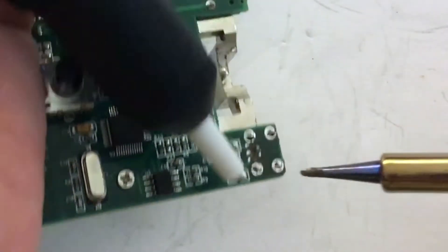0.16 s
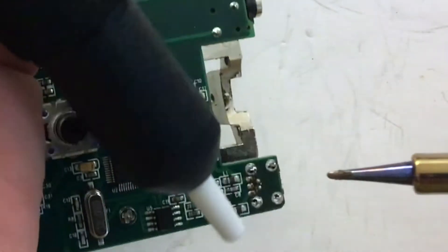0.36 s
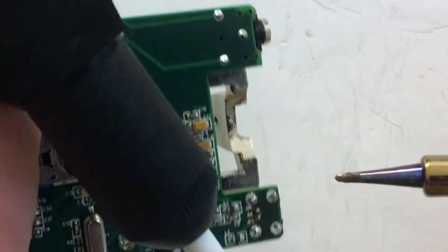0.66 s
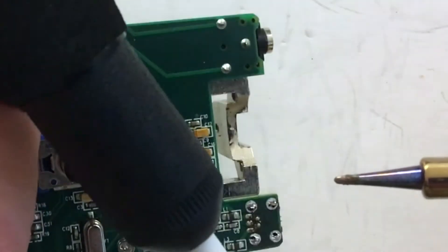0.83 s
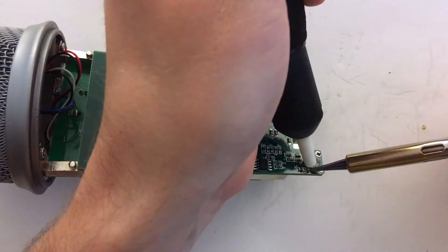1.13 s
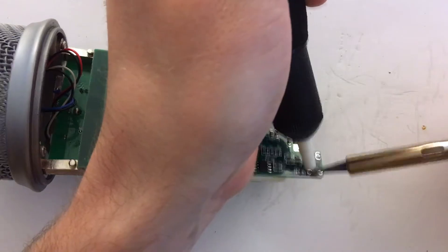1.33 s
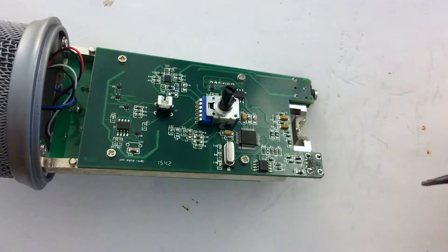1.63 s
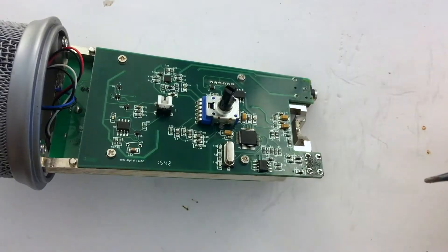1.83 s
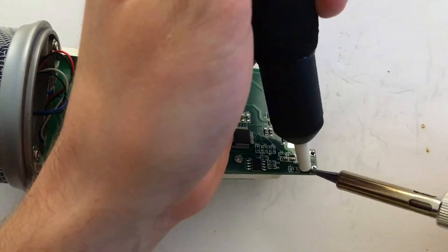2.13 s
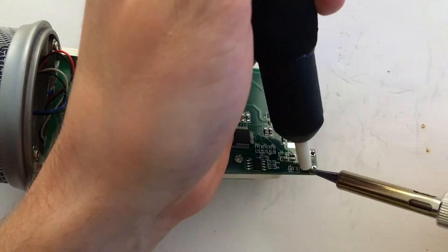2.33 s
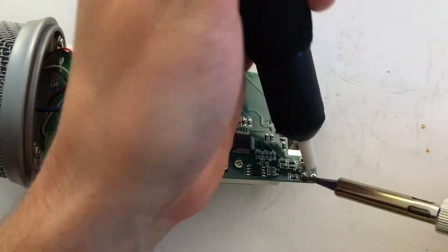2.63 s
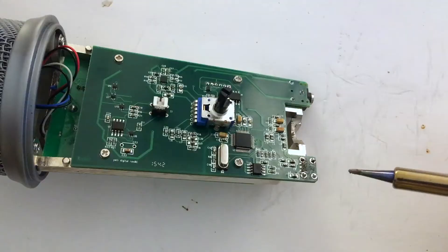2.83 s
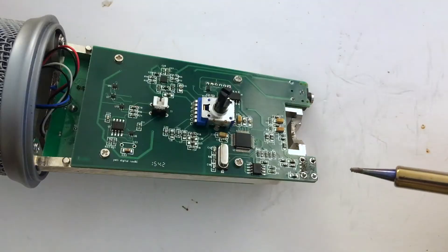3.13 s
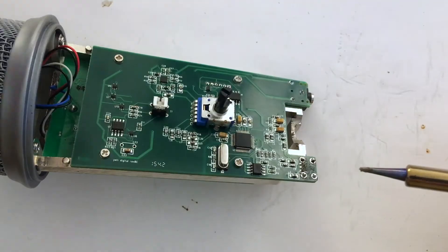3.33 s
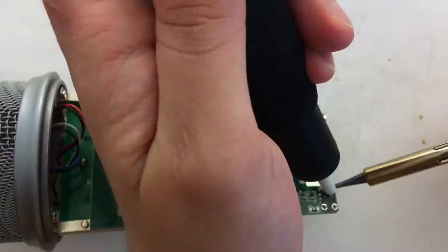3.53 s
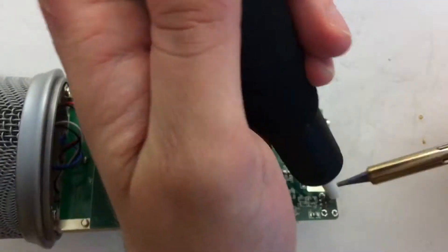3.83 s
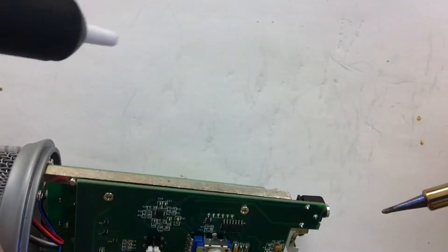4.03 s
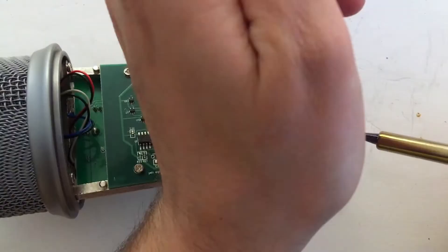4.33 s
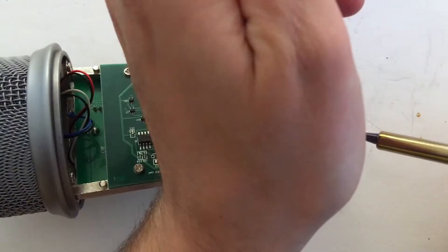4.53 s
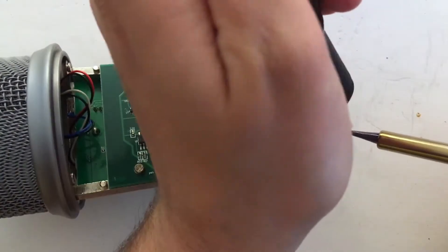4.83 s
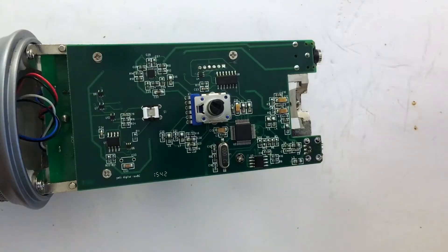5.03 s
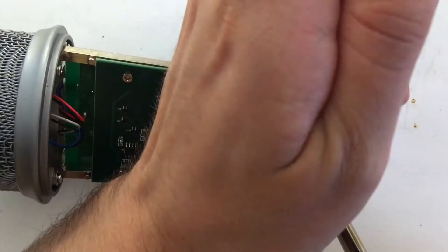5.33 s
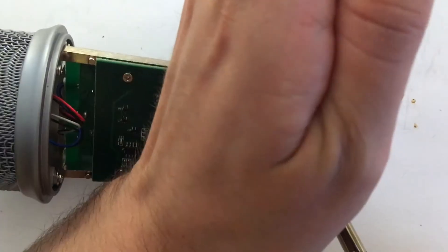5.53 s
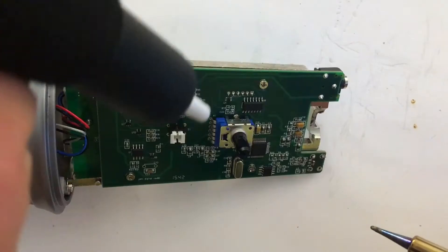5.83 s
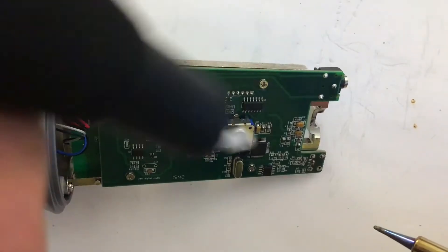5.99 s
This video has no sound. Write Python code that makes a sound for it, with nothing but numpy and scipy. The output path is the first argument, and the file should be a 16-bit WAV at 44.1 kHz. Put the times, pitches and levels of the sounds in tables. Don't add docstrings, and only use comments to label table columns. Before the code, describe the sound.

After a nearly silent second of soft sizzling and a tiny board squeak, a solder pump snaps hard, jolting in the fist and thumping the bench. Its spring rubs under the thumb and a loud bright click latches it, followed by a metallic shiver and the rod sliding back. The cycle repeats five times, mixed with hand rustles, knocks and scraping circuit board, dry and close in a small room with faint hiss.

```python
import sys
import numpy as np
from scipy import signal
from scipy.io import wavfile
from scipy.ndimage import uniform_filter1d

SR = 44100
rng = np.random.default_rng(int(sys.argv[2]) if len(sys.argv) > 2 else 0)


def master(y):
    cut = np.clip(np.atleast_2d(y).T, -1, 1)
    pcm = np.round(cut * 32767)
    wavfile.write(sys.argv[1], SR, pcm.astype(np.int16))


def invert_db(x):
    u = np.asarray(x, float) / 20
    return 10 ** u


N = 271656


def evened(x):
    return x / np.sqrt(np.mean(x ** 2) + 1e-20)


def read(points, hz):
    f, value = np.transpose(points)
    return np.interp(np.log(hz + 1), np.log(f + 1), value)


def add(mix, s, sound):
    part = mix[round(s * SR):][:len(sound)]
    part += sound[:len(part)]


def filtered(x, order, hz, kind):
    return signal.sosfilt(signal.butter(order, hz, kind, fs=SR, output="sos"), x)


def coloured(points, patchy_db=0., bands=()):
    frames, hz = N // 128 + 5, np.fft.rfftfreq(512, 1 / SR)
    a, b, patches = rng.standard_normal((frames, 257, 3)).T
    patches = uniform_filter1d(patches, size=6, axis=0)
    patches = evened(uniform_filter1d(patches, size=14, axis=1))
    shape_db = read(points, hz)[:, None]
    for f, width, db in bands:
        shape_db = shape_db + db / (1 + (2 * (hz[:, None] - f) / width) ** 2)
    z = (a + 1j * b) * invert_db(shape_db + patchy_db * patches)
    return evened(signal.istft(z, nperseg=512, noverlap=384)[1][:N])


def band(lo_hz, hi_hz, lumpy):
    lumps = np.exp(lumpy * evened(uniform_filter1d(rng.standard_normal(N), size=900)))
    return evened(filtered(lumps * rng.standard_normal(N), 3, [lo_hz, hi_hz], "bandpass"))


def swells(rows):
    t = np.linspace(0, N / SR, N // 64)
    power = sum(invert_db(2 * db) * np.exp(-(2.6 * (t - s) / length) ** 2) for s, length, db in rows)
    return np.interp(np.arange(N) / SR, t, power)


def ring(modes, rise_s, luck, spread):
    t = np.arange(round(SR * max(m[2] for m in modes)) + 8) / SR
    y = np.zeros(len(t))
    for (hz, db, t60), (force, detune, phase) in zip(modes, luck):
        decay = invert_db(db + 8.4 * (force - .5) - 60 * t / t60)
        y += decay * np.sin(2 * np.pi * (hz * (1 + spread * (detune - .5)) * t + phase))
    y = y * (1 - np.exp(-(t / rise_s) ** 2))
    return y / abs(y).max()


def crack(noise, lo_hz, hi_hz, rise_s, t60):
    t = np.arange(len(noise)) / SR
    y = filtered(noise, 2, [lo_hz, hi_hz], "bandpass")
    y = y * invert_db(-60 * t / t60) * (1 - np.exp(-(t / rise_s) ** 2))
    return y / abs(y).max()


def struck(rows, rise_s, partner_db):
    out = np.zeros(N)
    for s, db, hz, t60 in rows:
        note = [(hz, 0, t60), (hz * 1.17, partner_db, t60)]
        add(out, s, invert_db(db) * ring(note, rise_s, np.full((2, 3), .5), 0))
    return out


# pitch_hz, level_db, t60_s
UPPER_MODES = [(6050, -0.5, 0.0025), (7440, 3.5, 0.01), (8554, -0.5, 0.013), (10770, -1.5, 0.01),
               (12950, -3, 0.018), (13800, -10.5, 0.005)]
SHELL_MODES = [(1106, -4, 0.066), (1450, 7.5, 0.021), (1630, 5, 0.0082), (2810, 1, 0.0016)]
BENCH_MODES = [(86, -16, 0.075), (149, -17, .25), (251, -6, 0.15), (375, -4, 0.026), (314, -1.5, 0.03),
               (652, -5, 0.017)]


def knocks(rows, rise_s, t60, trim_db, crack_db):
    air, wood = np.zeros(N), np.zeros(N)
    lucks, noises = rng.random((len(rows), 4, 6, 3)), rng.standard_normal((len(rows), 3, 900))
    for (s, db, hz, upper_db, shell_db, bench_db), luck, noise in zip(rows, lucks, noises):
        column = [(hz, 0, t60), (hz * .82, -7, t60 * 0.71), (hz * 1.0, -8, t60 * 0.38)]
        add(air, s, invert_db(db + trim_db[0]) * ring(column, rise_s, luck[0], 0))
        add(air, s, invert_db(db + upper_db + trim_db[1]) * ring(UPPER_MODES, rise_s, luck[1], 0.042))
        add(air, s, invert_db(db + shell_db + trim_db[2]) * ring(SHELL_MODES, rise_s, luck[2], 0.21))
        add(air, s, invert_db(db + crack_db[0]) * crack(noise[0], 2700, 14000, rise_s, t60))
        add(air, s, invert_db(db + upper_db + crack_db[1]) * crack(noise[1], 5500, 21000, rise_s, t60))
        add(air, s, invert_db(db + shell_db + crack_db[2]) * crack(noise[2], 360, 5400, rise_s, 3.5 * t60))
        push = luck[3] * [.6, 1, .08] + [.2, 0, .48]
        add(wood, s, invert_db(db + bench_db + trim_db[3]) * ring(BENCH_MODES, rise_s, push, 0.17))
    return air, wood


def voiced(rows, upper_db, shell_db, bench_db, edge=None, weight=None):
    table = np.column_stack([rows, np.zeros(len(rows))])
    lift, mass = table[:, edge or -1], table[:, weight or -1]
    shell_share = 0.53
    return np.column_stack([table[:, :3], upper_db + lift, shell_db + shell_share * mass, bench_db + mass])


def slides(rows, lengths_s, colour, chatter, bands=()):
    force = np.zeros(N)
    for (s, db, swell_db), length in zip(rows, lengths_s):
        u = np.linspace(-.5, .5, round(length * SR))
        add(force, s, invert_db(db + swell_db * u) * signal.windows.tukey(len(u), .1))
    slips = np.exp(chatter * evened(uniform_filter1d(rng.standard_normal(N), size=50)))
    return force * evened(slips) * coloured(colour, bands=bands)


def shiver(rows, t60, colour, bands=()):
    force, t = np.zeros(N), np.arange(SR // 3) / SR
    for s, db, *_ in rows:
        add(force, s, invert_db(db - 60 * t / t60) * np.minimum(t / 0.0042, 1))
    return force * coloured(colour, patchy_db=-2.2, bands=bands)


# pitch_hz, density_db [dB per Hz]
HISS_COLOUR = [(40, -15.5), (100, -1.5), (300, -1.5), (800, -15), (2000, -23), (6000, -14.5), (14000, -12),
               (16000, -27)]


def microphone_hiss():
    return invert_db(-85) * coloured(HISS_COLOUR, patchy_db=1.5)


# start_s, level_db, brightness_db, stand_sway_db
SETTINGS = [(0, -84, 0, -62), (0.601, -89.5, -1, -70), (1.05, -89.5, -1.5, -65), (1.638, -80, -2.5, -79.5),
            (2.078, -85, -0.5, -71), (3.449, -83, 0, -67), (3.911, -80.5, -1, -64.5),
            (4.346, -90, 1, -65.5), (4.873, -80, -1.5, -64), (5.345, -87, -1, -61.5)]


def steps(levels_db):
    starts = [row[0] for row in SETTINGS]
    now = np.searchsorted(starts, np.arange(N) / SR, "right") - 1
    return invert_db(2 * np.asarray(levels_db))[now]


# start_s, level_db, swell_db over the slide
SHOTS = [(1.3159, -38, -8.5), (2.4419, -33.5, -1), (3.689, -33, 16.5), (4.551, -35, -3), (5.4665, -34.5, 6)]
# middle_s, length_s, level_db
LURCHES = [(1.55, 0.32, -60.5), (2.55, 0.17, -74), (3.34, .3, -66.5), (4.33, 0.079, -60), (5.96, 0.15, -52)]
# pitch_hz, level_db
MOTOR = [(24.2, -71), (48.4, -66), (71, -77)]
MOTOR_START_S = 4.86
NOD_HZ, NOD_DB, NOD_T60_S = 42.6, -57, 0.64


def stand():
    t, nods = np.arange(N) / SR, np.zeros(N)
    for s, *_ in SHOTS:
        add(nods, s, invert_db(NOD_DB - 60 * t[:SR] / NOD_T60_S) * np.minimum(t[:SR] / 0.033, 1))
    sway = np.sqrt(steps([row[3] for row in SETTINGS]) + swells(LURCHES))
    hum = sum(invert_db(db) * np.sqrt(2) * np.sin(2 * np.pi * hz * t) for hz, db in MOTOR)
    hum = hum * np.clip((t - MOTOR_START_S) / 0.044, 0, 1)
    narrow = band(NOD_HZ * 1.1, NOD_HZ * 1.3, 0)
    return sway * band(6, 15, 0) + invert_db(-83) * band(15, 140, .3) + (nods + invert_db(-90)) * narrow + hum


# start_s, peak_db, pitch_hz
SPITS = [(0.0094, -75, 11300), (0.2663, -62, 11900), (0.3646, -61, 12300), (0.4409, -61, 13200),
         (0.4703, -60, 12300), (0.5501, -65, 9470), (0.5716, -63, 12300)]
# pitch_hz, density_db [dB per Hz]
SIZZLE_COLOUR = [(900, -14), (2600, -13), (5000, 0), (7600, -8), (11500, -4), (15500, -8)]
# middle_s, length_s, level_db
SIZZLE = [
    (.02, .08, -80),
    (.18, .2, -75),
    (.46, .22, -75),
]


def flux():
    spits = [(s, db, hz, .004) for s, db, hz in SPITS]
    return np.sqrt(swells(SIZZLE)) * coloured(SIZZLE_COLOUR) + struck(spits, .0003, partner_db=-2.5)


# pitch_hz, density_db [dB per Hz]
RUSTLE_COLOUR = [(1650, -45), (2800, -14), (3590, -3.5), (7070, -9.5), (8930, -13.5), (12000, -16.5),
                 (15200, -22), (16000, -28)]
# middle_s, length_s, level_db, brightness_db, skin_rub_db
MOVES = [(.17, 0.27, -85, -4, -2), (.47, 0.3, -82, -4, -5), (1.482, 0.25, -81.5, 2, 8.5),
         (1.732, .1, -76.5, 2, 0.5), (1.93, 0.18, -74, 0, 4), (2.513, 0.15, -74, -0.5, 10),
         (3.083, 0.16, -63.5, 8, 3), (3.198, 0.3, -74, -2, -0.5), (3.823, 0.085, -75, 3, -3),
         (4.168, .2, -74, 0, -3.5), (4.68, .2, -81, 2.4, 4), (5.17, 0.074, -67.5, 6.5, -8.5),
         (5.26, 0.1, -84, -1.5, -2), (5.61, 0.13, -69.5, .3, -4.5), (5.803, 0.2, -82, -4.5, 9),
         (6.114, 0.6, -79, 1, -7)]


def hands():
    layers = [band(90, 600, .3), band(700, 2500, .25), coloured(RUSTLE_COLOUR, patchy_db=1.5)]
    _, rest_db, rest_bright, _ = np.transpose(SETTINGS)
    s, length, db, bright, skin = np.transpose(MOVES)
    rests = [rest_db - rest_bright, rest_db + 0.5, rest_db + rest_bright]
    moves = [db - bright, db + skin, db + bright]
    out = np.zeros(N)
    for rest, move, layer in zip(rests, moves, layers):
        out += np.sqrt(steps(rest) + swells(zip(s, length, move))) * layer
    return out


# time_s, level_db, lower_line_hz, upper_line_hz, upper_over_lower_db
DRAG = [(0.799, -70, 1450, 1680, 4), (.815, -81, 1340, 1540, -6), (.85, -83, 1320, 1520, -5),
        (.885, -82, 1340, 1600, 5), (.93, -80, 1340, 1590, -1), (.97, -83, 1300, 1540, 0),
        (1.02, -81, 1300, 1590, 9), (1.049, -81, 1280, 1560, 9)]


def squeak():
    s, db, *lines_hz, tilt_db = np.transpose(DRAG)
    t = np.arange(s[0], s[-1], 1 / SR)
    r, out = np.exp(-np.pi * 70 / SR), np.zeros(N)
    for hz, side in zip(lines_hz, (-.5, .5)):
        turn = np.exp(2j * np.pi * np.cumsum(np.interp(t, s, hz)) / SR)
        noise = rng.standard_normal(len(t)) / turn
        narrow = signal.lfilter([1], np.convolve([1, -r], [1, -r]), noise)
        add(out, s[0], invert_db(np.interp(t, s, db + side * tilt_db)) * evened((narrow * turn).real))
    return out


# start_s, length_s, slips_hz, level_db
JUDDER = (5.908, .07, 192, -53)


def judder():
    s, length, hz, db = JUDDER
    u, out = np.linspace(0, 1, round(length * SR)), np.zeros(N)
    turns = 2 * np.pi * np.cumsum(hz * (1 - .07 * np.sin(2 * np.pi * u))) / SR
    db = db + 2.5 * evened(uniform_filter1d(rng.standard_normal(len(u)), size=300))
    slips = invert_db(-12 * u) * np.sin(turns) + np.sin(2 * turns)
    add(out, s, invert_db(db) * np.sqrt(np.sin(np.pi * u) + 1e-9) * slips)
    return out


# start_s, peak_db, hardness_db per octave
BUMPS = [(1.64, -59, 2), (1.95, -60, 9), (3.065, -40, -8), (3.185, -40.5, -13), (3.224, -45, -8),
         (3.269, -44.5, -3), (3.318, -48.5, -11), (4.308, -58.5, 10.5)]


def bumps():
    wood = np.zeros(N)
    for (s, db, hard_db), luck in zip(BUMPS, rng.random((len(BUMPS), 6, 3))):
        modes = [(hz, d + hard_db * np.log2(hz / 300), t60) for hz, d, t60 in BENCH_MODES]
        add(wood, s, invert_db(db - 4.0) * ring(modes, 0.0017, luck, 0.33))
    return wood


# middle_s, length_s, level_db
SCRAPES = [
    (2.995, 0.025, -54),
    (3.035, 0.018, -45.5),
    (3.095, 0.048, -52.5),
    (3.24, .12, -63),
]


def scrape():
    start_s, end_s, catches_per_s = 2.9, 3.5, 780
    count = round((end_s - start_s) * SR)
    size = invert_db(4.1 * np.minimum(rng.exponential(1, count), 4))
    size = size * (rng.random(count) < catches_per_s / SR)
    kind, out = rng.integers(0, 8, count), np.zeros(N)
    board = [(410, 2.0, 0.028), (820, 4.5, 0.017), (1210, 7.0, 0.017),
             (1860, 5.0, 0.013), (3060, 5.5, 0.0088), (4600, 2, 0.0059)]
    catches = np.zeros(count)
    for k, luck in enumerate(rng.random((8, 6, 3))):
        catches += signal.oaconvolve(size * (kind == k), ring(board, 0.00024, luck, 0.36))[:count]
    add(out, start_s, evened(catches))
    return np.sqrt(swells(SCRAPES)) * out


# start_s, peak_db, pitch_hz, t60_s
RAPS = [(.7995, -65, 2080, .03), (1.3232, -28, 5400, .025), (1.3425, -32, 4800, .012),
        (2.8505, -30, 4500, .006), (2.9805, -47, 550, .015), (2.9915, -38, 450, .012),
        (3.0262, -38, 900, .018), (3.033, -40, 2000, .015), (3.036, -43, 3200, .02),
        (3.056, -44, 400, .015), (3.075, -44, 750, .04), (3.0855, -40, 1800, .025),
        (3.166, -49, 1500, .015), (3.2125, -39, 1150, .025), (3.2135, -37, 200, .04),
        (3.2255, -42, 220, .03), (3.239, -43, 200, .03), (3.254, -46, 200, .03), (3.388, -60, 500, .015),
        (3.442, -60, 1400, .012), (3.6935, -28, 5000, .012), (3.6965, -26, 6050, .02),
        (3.7155, -32, 4900, .025), (5.0752, -30, 4400, .005), (5.865, -50, 3700, .008),
        (5.8775, -30, 4500, .012), (6.008, -41, 3600, .008), (6.022, -36, 4400, .015)]


def raps():
    return struck(RAPS, .0005, partner_db=-7)


# start_s, peak_db, pitch_hz
TICKS = [(0.552, -58, 5330), (1.3033, -64, 5300), (1.71, -41, 3800), (1.7893, -57.5, 3630),
         (3.0729, -36, 4930), (3.5796, -59, 4200), (3.8495, -45.5, 4310), (3.9687, -52.5, 4060),
         (4.1605, -44.5, 4000), (4.775, -54.5, 4070), (4.9162, -59, 3370), (5.1936, -47, 4740),
         (5.6917, -52.5, 4130), (5.7366, -44.5, 3760), (5.4435, -69.5, 4600)]
# start_s, peak_db,
# pitch_hz, weight_db
FUMBLING = [(0.802, -68, 5570, -6), (1.9707, -49, 4870, 0), (2.7586, -57, 3420, -4.5),
            (2.9913, -50, 3430, -12), (3.017, -43, 4050, -4.5), (3.0261, -43, 3040, -13),
            (3.0872, -46, 3100, -17), (3.1575, -52, 3230, -17), (3.2126, -49.5, 3930, 2),
            (4.1865, -47, 4160, -1.5), (4.3453, -81.5, 4270, 6.5), (4.8754, -70.5, 4950, 7.5),
            (4.9987, -57.5, 2930, -8), (5.2103, -41, 4670, -3), (6.0245, -48, 4300, -32),
            (6.029, -35.5, 4350, -5.5)]


def fumbles():
    light = voiced(TICKS, upper_db=-11.5, shell_db=-11, bench_db=-16.5)
    heavy = voiced(FUMBLING, upper_db=-19.5, shell_db=7.0, bench_db=1, weight=3)
    air, wood = knocks(np.vstack([light, heavy]), 0.00032, .005,
                       trim_db=[-1, -7.0, -7, 6.0], crack_db=[1.5, 2.5, 1.5])
    return air, filtered(wood, 2, 170, "highpass")


# start_s, level_db, swell_db; then length_s of each
PRESSES = [(1.645, -76.5, 6.5), (2.745, -71, 7.5), (3.912, -75, -1.5), (4.92, -82.5, -12.5), (5.7, -73, 2)]
PRESS_S = [.205, .107, .123, .157, .17]
# pitch_hz, width_hz, lift_db
SQUEEZED_BANDS = [(1400, 300, 6), (3610, 300, 15), (4950, 350, 12), (8800, 600, 12)]
# start_s, level_db, swell_db; then length_s of each
RETURNS = [(1.9595, -40.5, -11), (2.979, -47, -6), (4.1598, -45, -4), (4.174, -38, 3), (5.1935, -45.5, -2),
           (6.003, -42, 15)]
RETURN_S = [.014, .014, .008, .014, .02, .027]
# pitch_hz, width_hz, lift_db
SLACK_BANDS = [(4300, 1100, 8), (9100, 900, 9)]
# pitch_hz, density_db [dB per Hz]
ROD_COLOUR = [(300, -11), (1000, -21), (2500, -19), (3300, -6.5), (5600, -6.5), (10700, -6.5), (15700, -32),
              (16500, -40.5)]


def rod_slides():
    pressed = slides(PRESSES, PRESS_S, ROD_COLOUR, chatter=.3, bands=SQUEEZED_BANDS)
    return pressed + slides(RETURNS, RETURN_S, ROD_COLOUR, chatter=.25, bands=SLACK_BANDS)


# pitch_hz, width_hz, lift_db
COIL_BANDS = [(4500, 600, 13), (6500, 280, 9), (9200, 500, 12), (12100, 500, 8)]


def gripped(rows):
    s, _, hz, width, lift_db = np.transpose(rows)
    frame_s = np.arange(N // 128 + 5) * 128 / SR
    now = np.maximum(np.searchsorted(s - .02, frame_s) - 1, 0)
    (_, _, db), (f, w, second_db), (_, *third), fourth = COIL_BANDS
    return [(hz[now], width[now], db), (f, w, second_db + lift_db[now]), (2 * hz[now], *third), fourth]


# start_s, level_db
FIRED_SHIVER = [(1.332, -34.5), (2.459, -35.5), (3.705, -36), (4.569, -36), (5.483, -33.5)]
# start_s, level_db, lowest_band_hz, its_width_hz, second_band_lift_db
LATCH_SHIVER = [(1.852, -31, 4600, 650, 0), (2.854, -33, 4400, 1300, -8), (4.037, -31.5, 4500, 500, -5),
                (5.079, -34.5, 4300, 850, -7), (5.873, -34, 4500, 800, -7)]
# pitch_hz, density_db [dB per Hz]
FIRED_COLOUR = [(290, -25.5), (500, -8.5), (562, -36.5), (822, 4.5), (1220, -2.5), (1870, -0.5),
                (2500, -2.5), (7380, -2), (15100, -16), (16500, -26.5)]
LATCH_COLOUR = [(600, -21.5), (1200, -13.5), (1850, 0.5), (2300, -11), (3200, 3.5), (5600, -4.5),
                (11000, -4), (14000, -14.5), (16300, -24.5)]


def coil_spring():
    fired = shiver(FIRED_SHIVER, .17, FIRED_COLOUR)
    return fired + shiver(LATCH_SHIVER, 0.16, LATCH_COLOUR, gripped(LATCH_SHIVER))


# start_s, peak_db, pitch_hz, edge_db, weight_db
LATCHING = [(1.8496, -14.5, 4250, -1.5, -4.5), (1.8575, -26.5, 4600, -2.5, -5.5),
            (1.8633, -29, 4660, -0.5, 0), (2.8518, -12, 4640, -8, -3.5), (2.8523, -20, 2730, -7.5, -7),
            (2.8654, -37, 4600, -18, 5), (4.0345, -14.5, 4384, 0, -3), (4.0407, -27, 4610, -4, -10),
            (5.077, -22.5, 4460, 7, 4.5), (5.0834, -26.5, 4550, -6.5, -15.5),
            (5.8704, -11.5, 4374, -3, -20), (5.8853, -40.5, 4600, 10, 14)]


def latch_clicks():
    rows = voiced(LATCHING, upper_db=-0.5, shell_db=-14, bench_db=-34, edge=3, weight=4)
    air, wood = knocks(rows, .001, 0.0083, trim_db=[0.0, -3.5, -7.0, -6.5], crack_db=[-2.5, 1.5, -1.5])
    return filtered(air, 2, 10300, "lowpass"), wood


SHOT_S = [.0148, .0155, .0145, .016, .0145]
# pitch_hz, density_db [dB per Hz]
SHOT_COLOUR = [(88, -30), (150, -1), (1210, 5), (2090, -18), (3700, 4.5), (4330, -2.5), (5480, -0.5),
               (6550, -7.5), (14700, -12), (16500, -35.5)]


def piston_travel():
    return slides(SHOTS, SHOT_S, SHOT_COLOUR, chatter=.2)


# start_s, peak_db, pitch_hz, edge_db (upper modes), weight_db (shell, bench)
FIRING = [(1.3188, -31, 5190, 3, -1.5), (1.321, -38, 5360, -19.5, 3), (1.3304, -15.5, 5060, -23.5, -6.5),
          (1.3353, -35.5, 4800, -4, 8.5), (1.3386, -33, 4630, 1.5, 1.5), (1.3533, -37, 4330, -8, -3.5),
          (2.4465, -27, 4520, -5.5, -8), (2.4483, -32, 5100, -9.5, -6), (2.4515, -30.5, 4800, 1, -4),
          (2.4569, -17.5, 5380, -4, -9), (2.4648, -29.5, 5250, -4, -19.5), (2.482, -30, 5720, -9, -11.5),
          (3.6888, -26, 4850, -17.5, -7), (3.698, -30, 5970, -9.5, -9.5), (3.7026, -16, 4560, -3.5, -8),
          (3.7101, -29, 5220, -0.5, -8.5), (4.5519, -28.5, 3840, -2.5, -1), (4.566, -22.5, 4650, 2.5, -0.5),
          (4.5746, -29.5, 5930, -5, -16), (5.4676, -28.5, 3540, -1, -36), (5.4747, -25, 5600, -13.5, -8),
          (5.4815, -19.5, 4500, 2.5, -8.5), (5.4967, -35, 5100, -1.5, -5)]
# start_s, peak_db, pitch_hz, t60_s
JOLTS = [(1.3222, -23, 750, .004), (1.3298, -21, 330, .012), (2.4445, -30, 1250, .012),
         (2.4568, -28, 300, .012), (2.4572, -25, 1050, .009), (3.69, -30, 500, .008),
         (3.6948, -28, 600, .007), (3.7025, -22, 330, .012), (4.5658, -29, 330, .012),
         (4.5662, -28, 1450, .012), (4.552, -30, 1500, .012), (5.4735, -26, 500, .007),
         (5.4812, -20, 300, .014), (2.8522, -29, 1200, .02), (1.9705, -43, 430, .018),
         (1.949, -54, 450, .02), (4.1872, -42, 700, .008), (5.8708, -31, 1300, .012),
         (4.0348, -23, 3100, .007), (5.4855, -30, 250, .12), (5.4815, -26, 1100, .015)]


def piston_slams():
    rows = voiced(FIRING, upper_db=1, shell_db=-3.5, bench_db=-2, edge=3, weight=4)
    air, wood = knocks(rows, 0.00091, 0.0076, trim_db=[-0.5, -3.0, -7, -2], crack_db=[-4, 2.5, .5])
    return air + struck(JOLTS, .0004, partner_db=-12), wood


CHANGES = [0, 1.05, 1.64, 2.078, 3.45, 3.911, 4.346, 5.345, 6.16]
# pitch_hz, t60_s
ROOM_DECAY = [(100, 0.39), (300, 0.33), (800, 0.28), (2000, 0.26), (5000, 0.26), (10000, 0.2),
              (15000, 0.21)]


def room(x, delay_s=.004):
    out = np.zeros(N)
    for start, end in zip(CHANGES, CHANGES[1:]):
        taps = np.zeros(SR // 2)
        at = np.arange(round(delay_s * SR), len(taps) - 16, 16)
        taps[at + rng.integers(0, 16, len(at))] = rng.choice([-1., 1.], len(at))
        hz, t, z = signal.stft(taps, SR, nperseg=256)
        decay = invert_db(-60 * t / read(ROOM_DECAY, hz)[:, None])
        tail = signal.istft(z * decay, SR, nperseg=256)[1]
        part = x[round(start * SR):round(end * SR)]
        add(out, start, signal.fftconvolve(part, tail / np.linalg.norm(tail))[:len(part)])
    return out


def scene():
    background = stand() + flux() + hands() + squeak() + judder()
    fumble, bump = fumbles()
    handling = fumble + raps() + scrape() + rod_slides()
    spring = coil_spring()
    latch, tap = latch_clicks()
    travel = piston_travel()
    fire, thump = piston_slams()
    bench = thump + tap + bump + bumps()
    wet = invert_db(-18.0) * fire + invert_db(-17) * travel + invert_db(-18.5) * latch
    wet = wet + invert_db(-7.5) * handling + invert_db(-9.5) * spring + invert_db(-12.0) * bench
    return (background + handling + spring + latch + travel + fire + bench + room(wet))[None]


def low_pass(x):
    return signal.sosfilt(signal.butter(12, 17020, fs=SR, output="sos"), x)


def record(dry):
    heard = dry + microphone_hiss()
    edge_hz = 15900
    corners_hz = [0, edge_hz - 400, edge_hz + 200, 16900, 17200, SR / 2]
    edge = signal.firwin2(255, corners_hz, [1, 1, .12, .06, 0, 0], fs=SR)
    return low_pass(signal.oaconvolve(heard, edge[None], "same"))


dry = scene()
out = record(dry)
master(out)
```